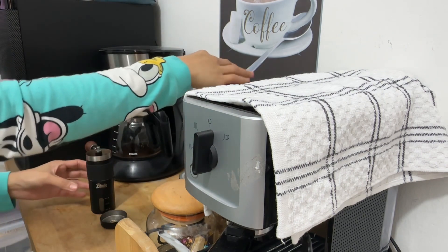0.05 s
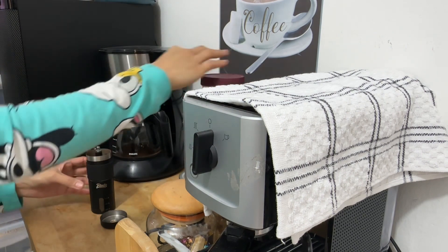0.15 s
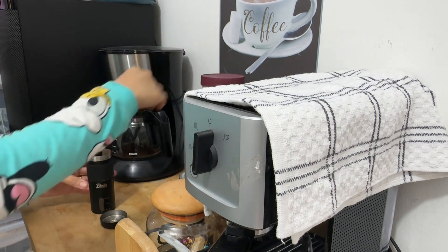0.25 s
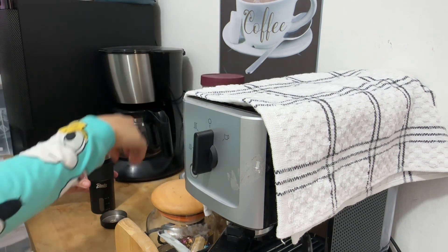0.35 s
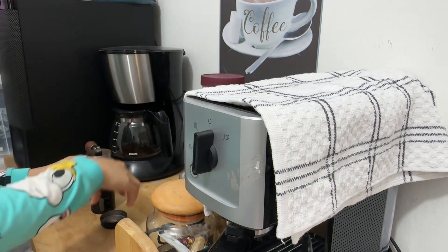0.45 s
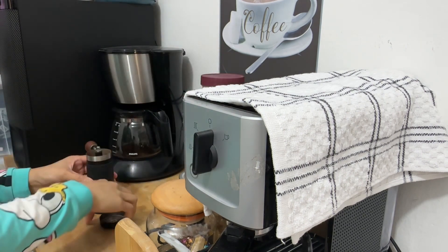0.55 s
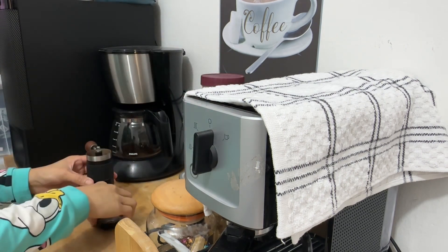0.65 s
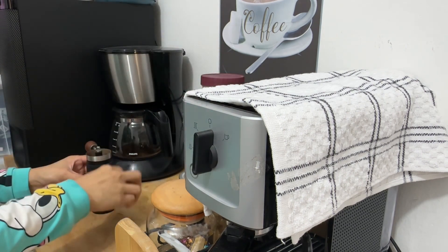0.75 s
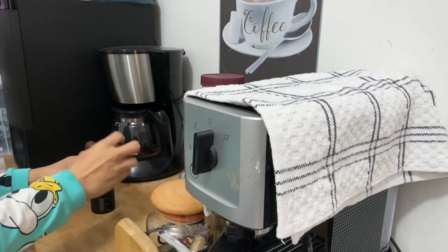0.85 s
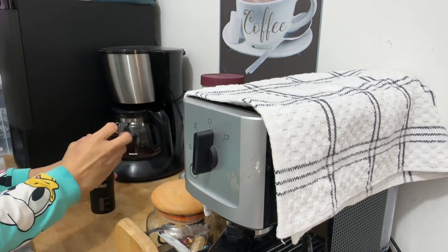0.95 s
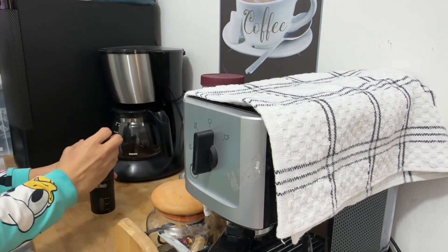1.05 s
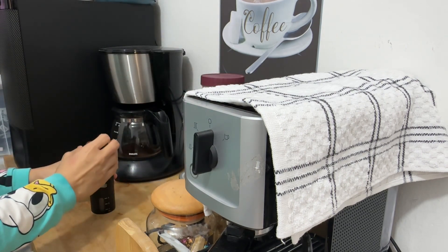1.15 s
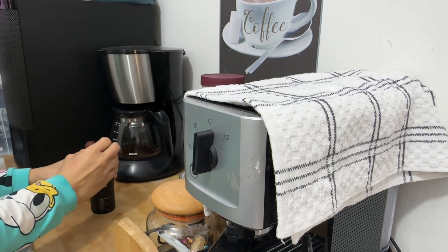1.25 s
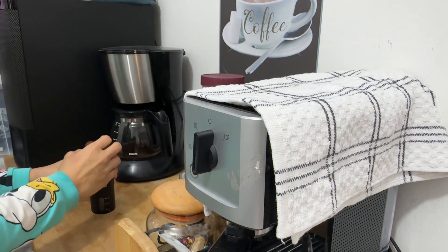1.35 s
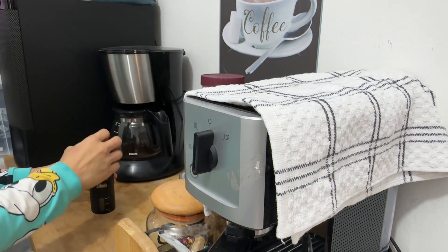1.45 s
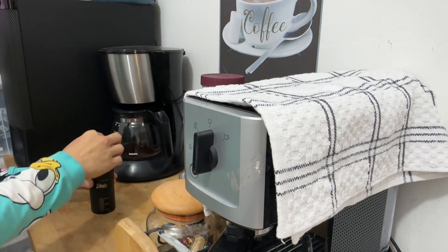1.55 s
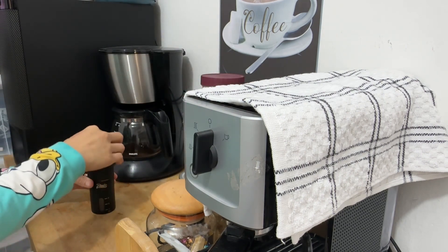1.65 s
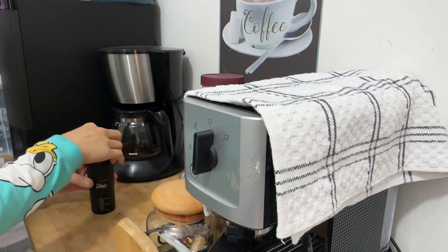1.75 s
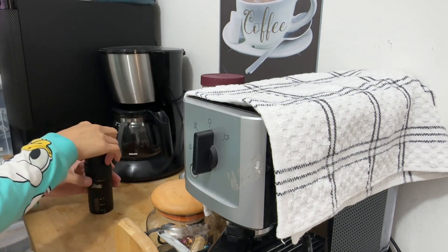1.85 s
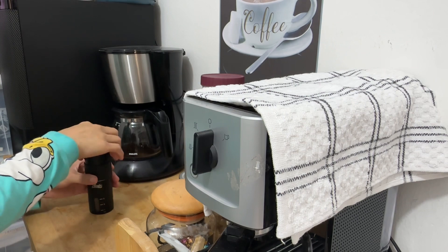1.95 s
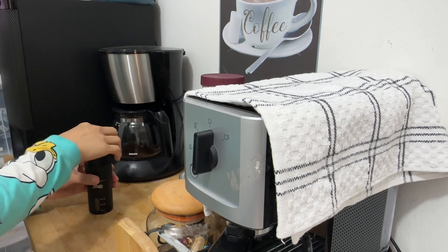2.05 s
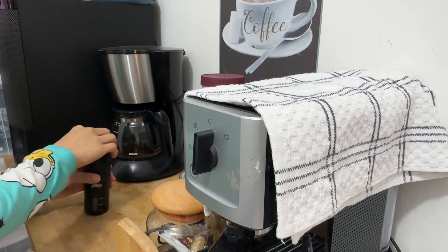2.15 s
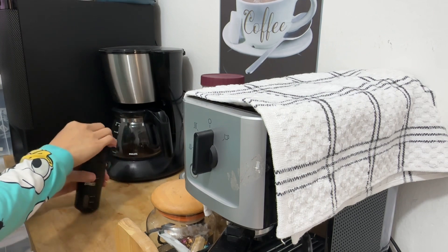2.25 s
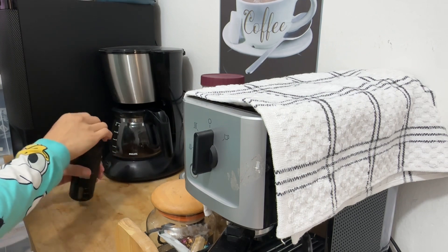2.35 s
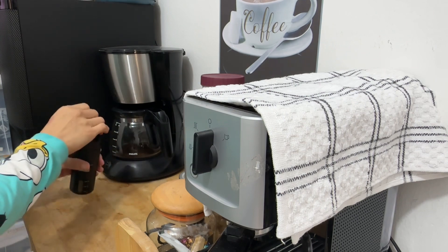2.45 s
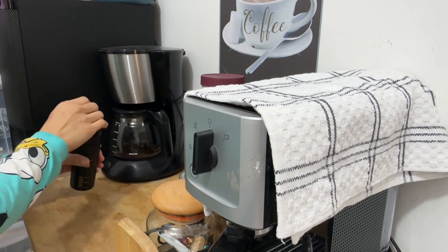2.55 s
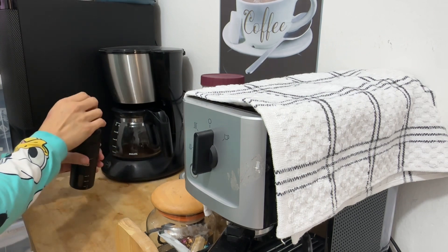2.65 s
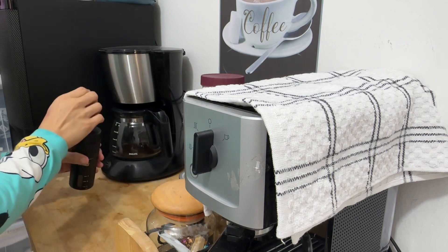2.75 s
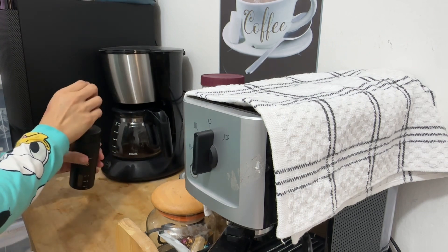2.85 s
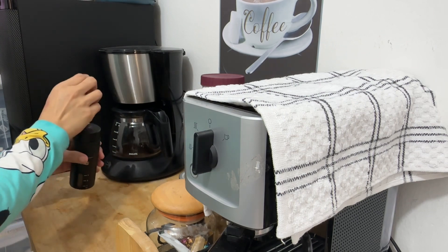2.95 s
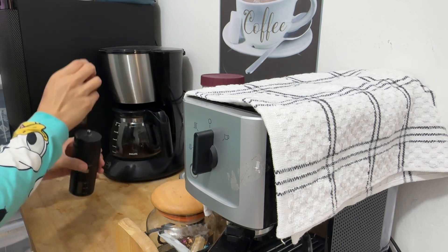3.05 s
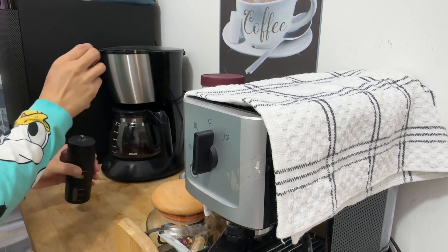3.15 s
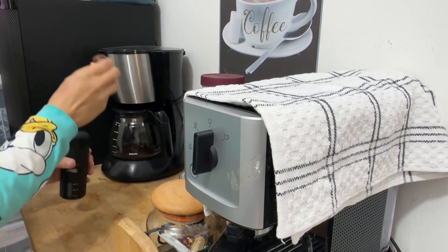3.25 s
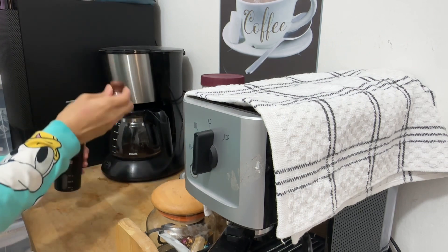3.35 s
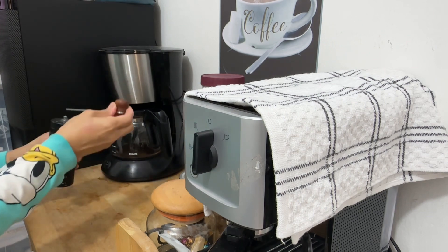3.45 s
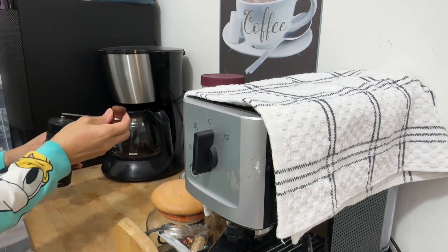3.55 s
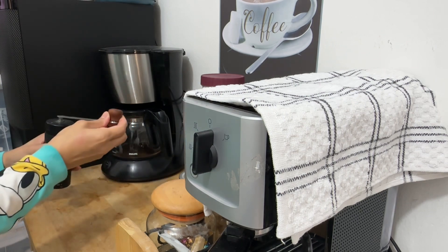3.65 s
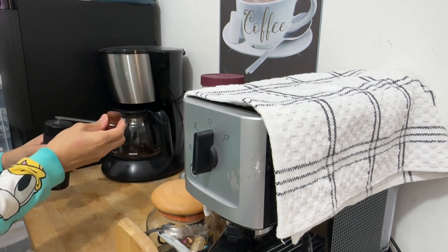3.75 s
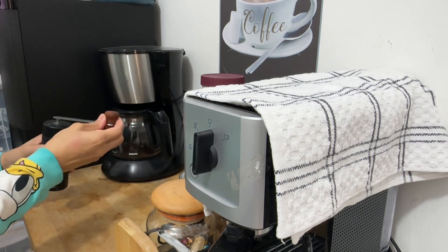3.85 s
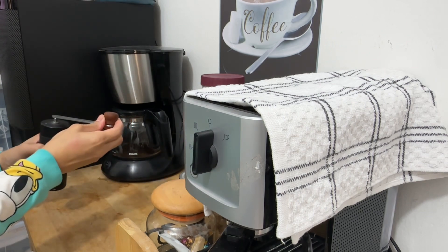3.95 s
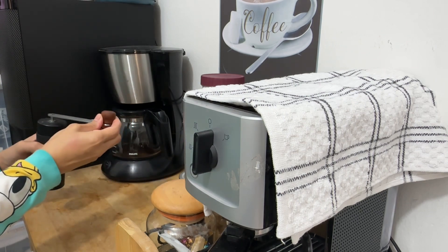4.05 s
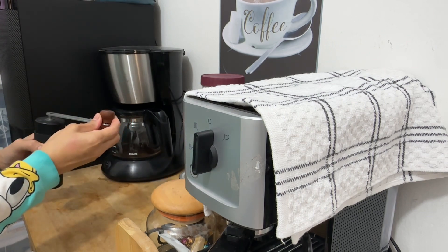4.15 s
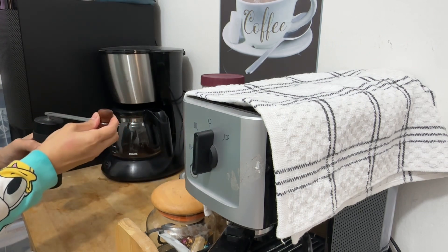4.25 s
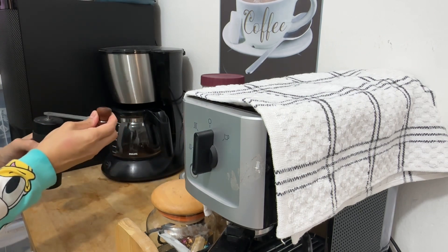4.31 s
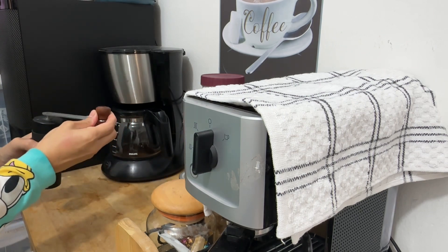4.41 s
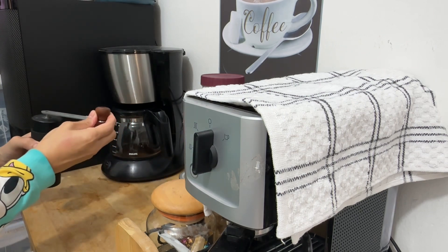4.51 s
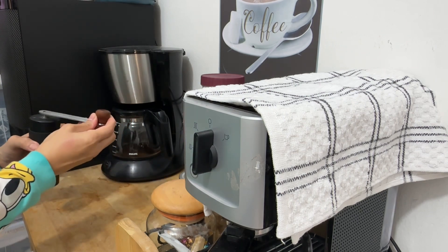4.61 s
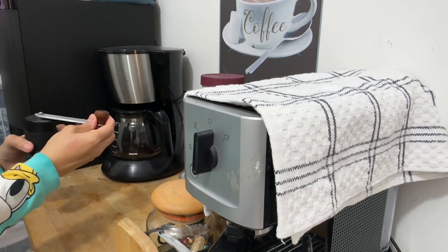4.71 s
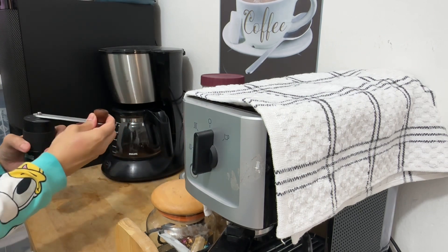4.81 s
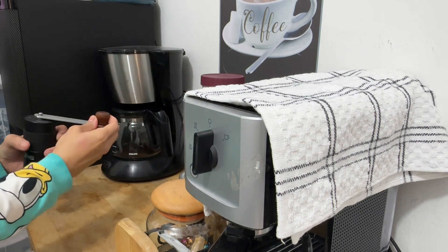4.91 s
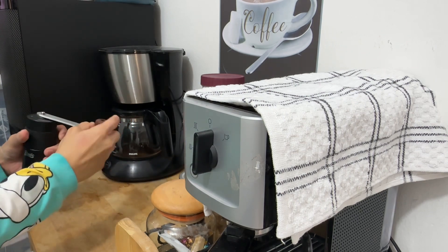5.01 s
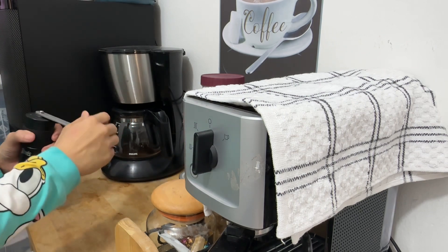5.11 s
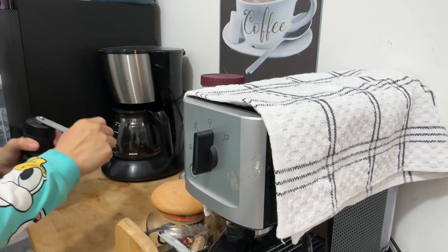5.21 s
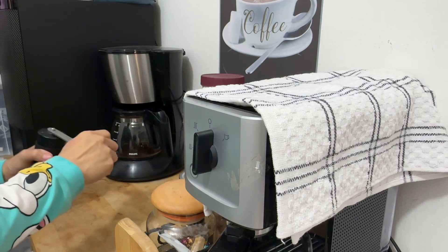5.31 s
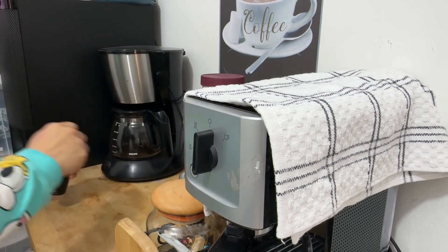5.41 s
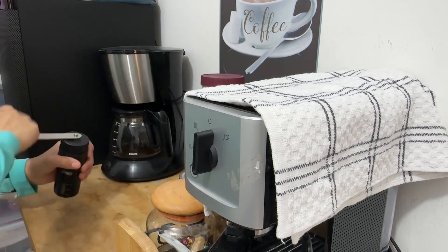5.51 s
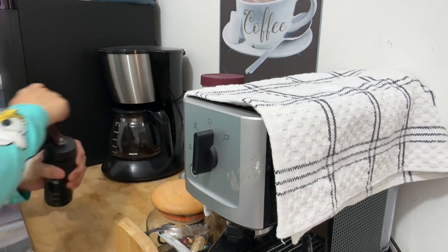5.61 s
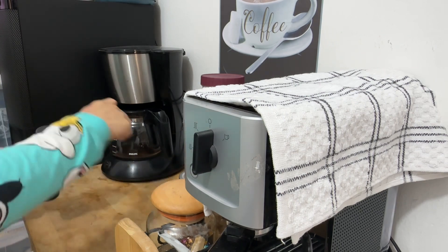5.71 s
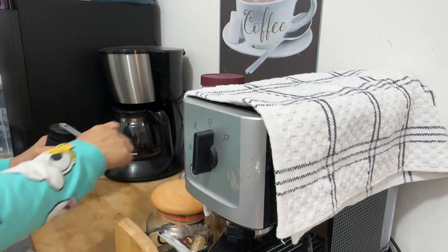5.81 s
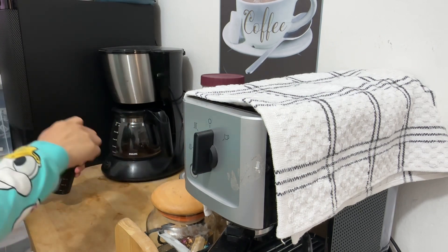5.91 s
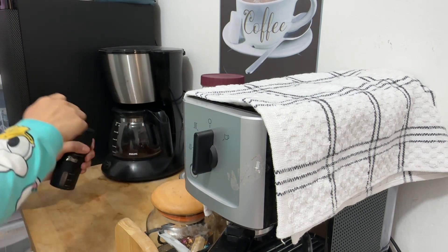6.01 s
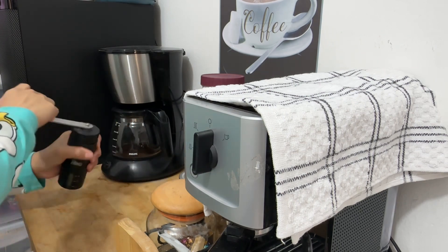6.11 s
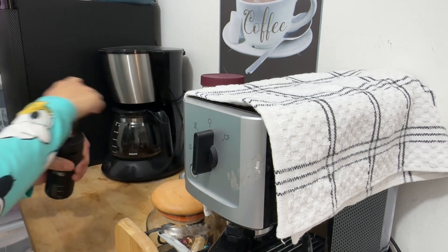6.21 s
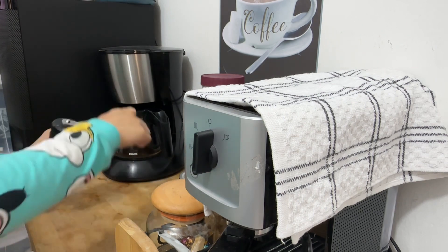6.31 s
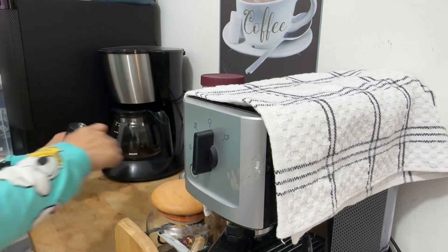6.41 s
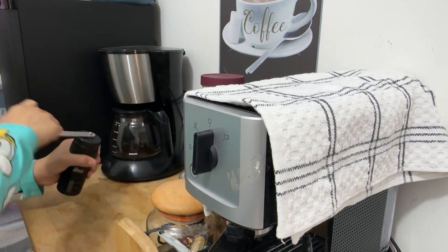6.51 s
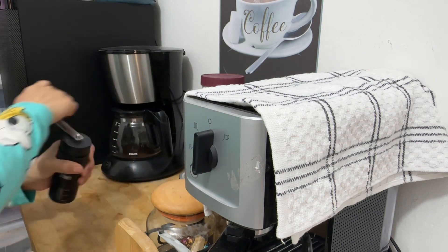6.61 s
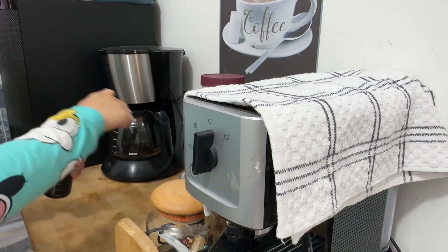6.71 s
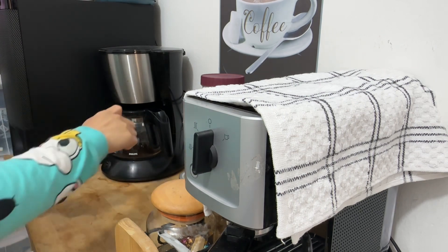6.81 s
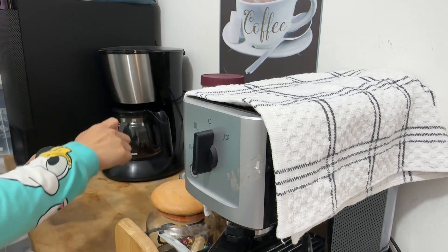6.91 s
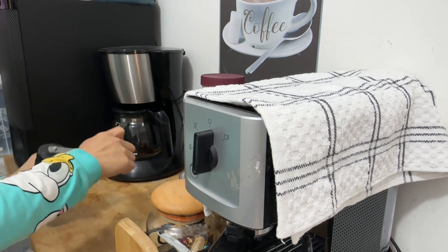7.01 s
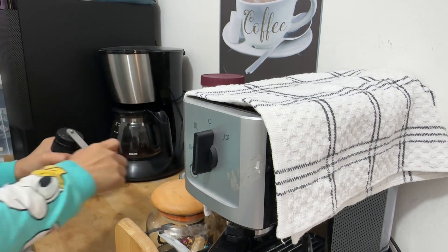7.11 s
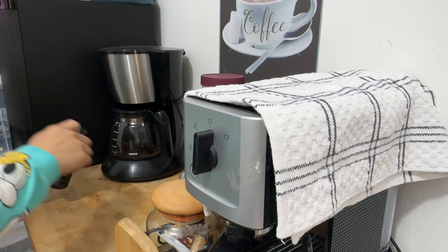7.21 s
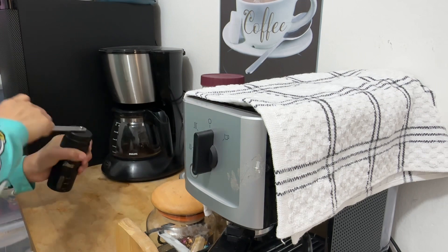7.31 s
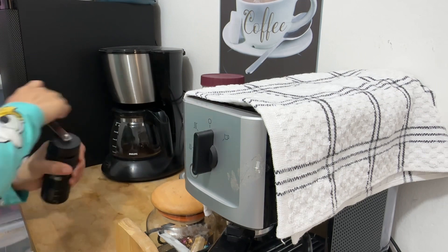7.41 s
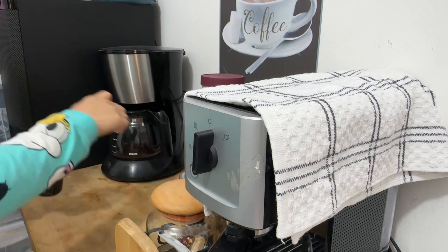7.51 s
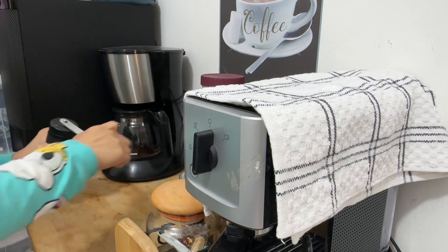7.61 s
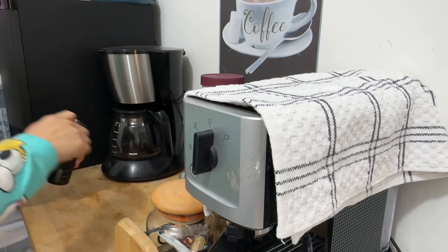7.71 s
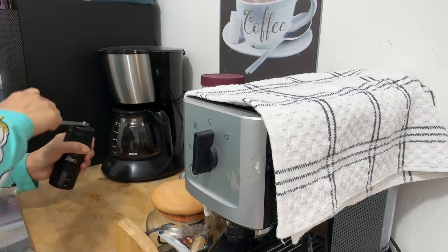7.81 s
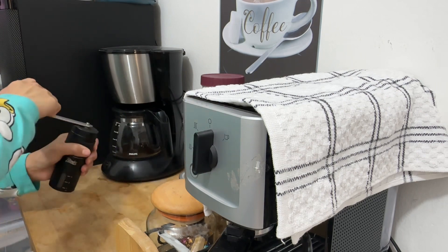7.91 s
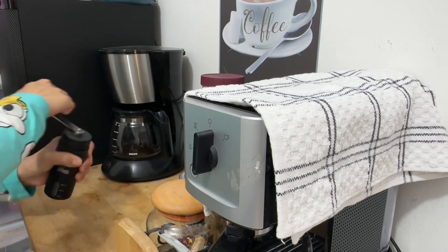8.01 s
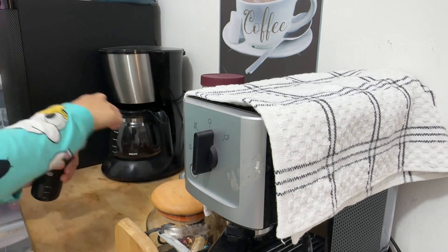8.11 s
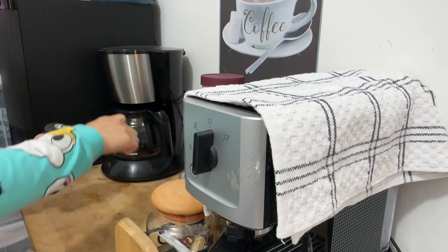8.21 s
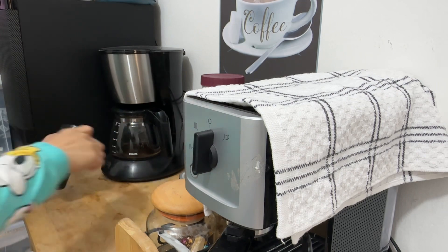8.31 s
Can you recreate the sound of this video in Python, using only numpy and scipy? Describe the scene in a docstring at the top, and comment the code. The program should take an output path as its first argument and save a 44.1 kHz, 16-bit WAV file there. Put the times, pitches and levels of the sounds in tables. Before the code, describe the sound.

Sparse handling comes first: a dull knock, bright steel ticks, a heavier thump on wood, light scuffs and clicks as the crank is fitted. Then hand grinding takes over, irregular dry crunching and cracking beans with fine rasp, a short catch and renewed turning until the end. Low steady hum and a faint throbbing whine, which fades as grinding starts. Close microphone, short kitchen reflections.

```python
"""A soft rub and a knock open the scene: a hand coffee grinder is handled on the counter of a small kitchen.
Clinks of its steel crank (noise bursts with ringing parts), rubs and more knocks then mingle.
From about 5 s the crank turns, with a short stall: random tiny breaks make the crunch, and beans snap.
A mains hum runs underneath throughout; a faint throbbing appliance whine fades as the grinding starts."""
import sys
import numpy as np
from scipy import signal
from scipy.fft import rfft, irfft, next_fast_len
from scipy.io import wavfile
from scipy.ndimage import uniform_filter1d, map_coordinates

SR = 44100
rng = np.random.default_rng(int(sys.argv[2]) if len(sys.argv) > 2 else 0)


def transcribe(signal):
    """Save signal, clipped to [-1, 1], as a 16-bit WAV file at the path in sys.argv[1]."""
    frames = np.atleast_2d(signal).T
    limited = np.clip(frames, -1, 1)
    pcm = np.round(limited * 32767).astype(np.int16)
    wavfile.write(sys.argv[1], SR, pcm)


N = 368676  # length of the scene in samples

# Beans caught between the burrs. Levels are relative.
# Columns: start_s, crack_db, crunch_db, crumble_s (time until the pieces die away), pitch_hz
BEANS = [(5.249, -31.5, -52, 0.0062, 1500), (5.266, -31, -39.5, 0.0057, 990),
         (5.309, -30.5, -53, 0.014, 1450), (5.338, -24, -34.5, 0.022, 1030),
         (5.373, -30.5, -38, 0.033, 583), (5.418, -24.5, -42.5, 0.0077, 600),
         (5.457, -20.5, -37.5, 0.0093, 635), (5.491, -23, -39, 0.006, 590), (5.56, -28.5, -40, 0.02, 1040),
         (5.648, -25.5, -43, 0.0036, 915), (5.655, -24, -36.5, 0.016, 1380),
         (5.687, -22.5, -34, 0.021, 860), (5.766, -23.5, -37, 0.0037, 537), (5.828, -31, -41, 0.012, 580),
         (5.872, -22, -65, 0.0022, 1400), (5.884, -17.5, -36, 0.0019, 1410),
         (6.018, -24.5, -51, 0.0089, 1420), (6.075, -24.5, -46, 0.0091, 1390),
         (6.131, -24.5, -39.5, 0.03, 580), (6.19, -24, -39.5, 0.036, 540), (6.222, -28.5, -38, 0.007, 503),
         (6.316, -32, -39, 0.0056, 570), (6.401, -29.5, -44, 0.016, 870), (6.444, -30, -43.5, 0.045, 520),
         (6.496, -31, -44, 0.055, 510), (6.689, -24, -48, 0.011, 1450), (6.766, -33.5, -72, .003, 2500),
         (6.916, -35.5, -68, 0.0071, 2480), (6.928, -24, -34.5, 0.0051, 1410),
         (6.957, -19, -37, .016, 1480), (6.987, -31, -35.5, 0.015, 620), (7.096, -21.5, -59, 0.004, 1400),
         (7.111, -29.5, -48, .004, 1390), (7.133, -27, -35, 0.032, 900), (7.205, -20, -36, 0.0073, 1150),
         (7.233, -26.5, -43, 0.015, 870), (7.306, -32, -45, 0.022, 580), (7.435, -25, -37, 0.012, 965),
         (7.496, -37, -39, 0.009, 920), (7.651, -29, -37, 0.019, 910), (7.687, -28, -49.5, 0.023, 610),
         (7.787, -26.5, -46, 0.017, 990), (7.834, -27.5, -59, 0.032, 1840), (7.872, -22, -58, 0.004, 1840),
         (7.918, -22, -39, 0.0042, 1810), (7.952, -18.5, -44.5, 0.0038, 1400),
         (7.961, -23.5, -44, 0.014, 1410), (8.053, -26, -44.5, 0.013, 980), (8.137, -26, -51, .005, 1410),
         (8.147, -21.5, -43, 0.0068, 1430), (8.237, -24.5, -36.5, 0.0053, 666),
         (8.273, -23.5, -32.5, 0.012, 850), (8.3, -41, -40, 0.026, 546), (8.346, -26, -39.5, 0.003, 1020),
         (8.356, -25.5, -52, .005, 1030)]
# Force on the crank in three runs, parted by a stall and a brief catch. Columns of each run: time_s, effort_db
EFFORT_RUNS = [
    [(5.26, -59), (5.31, -48.5), (5.4, -44), (5.53, -48), (5.6, -49), (5.7, -46), (5.8, -51.5),
     (5.98, -51.5), (6.06, -48), (6.2, -45), (6.28, -54), (6.36, -49), (6.48, -46.5), (6.64, -46),
     (6.72, -51.5), (6.79, -62.5)],
    [(6.925, -54), (6.97, -47), (7.015, -46), (7.05, -43.5), (7.13, -55.5), (7.23, -46.5), (7.35, -47),
     (7.45, -45.5), (7.61, -49.5), (7.7, -48.5), (7.78, -53)],
    [(7.787, -47.5), (7.83, -47.5), (8.21, -45.5), (8.33, -51.5), (8.36, -43)],
]
# Broad colour of the coarse crunch. Columns: frequency_hz, level_db
CRUNCH_COLOUR = [(60, -21), (160, -3), (270, -7.5), (330, -17), (480, -2), (1000, 7.5), (1600, -13),
                 (2500, 6), (5000, -26)]
# Resonances of the grinder's barrel. Columns: frequency_hz, width_hz, level_db
BARREL_MODES = [(190, 120, -15), (540, 103, 3), (935, 140, 3), (1489, 78, 6.5)]
# Broad colour of the fine grit. Columns: frequency_hz, level_db
GRIT_COLOUR = [(300, -53), (1200, 6.5), (2200, 3), (3300, -1), (4600, 6), (6300, -10.5), (8000, -12),
               (10000, -6.5), (12500, -0.5), (15500, -45)]
# Resonances of the burrs. Columns: frequency_hz, width_hz, level_db
BURR_MODES = [(2796, 54, 6.5), (4100, 1800, -1.5), (5640, 29, 2.5), (8110, 28, 1.5)]
# Hiss of the finest dust. Columns: frequency_hz, level_db
DUST_COLOUR = [(2000, -9.5), (6000, -1.5), (9500, 0.5), (12000, -11), (15000, 4.5), (16000, -26)]
EASY_EFFORT_DB = -47  # an ordinary turn of the crank
GRIT_DB, CRUNCH_DB = 4, -3  # fine and coarse pieces, over the effort
CRUNCH_GROWS, DUST_GROWS = 2, 1.35  # dB of crunch per dB of effort; dB of dust hiss per dB of grit
BROAD_DB = -9  # broad part of a bean's crunch, relative to its crunch_db
SHARDS_DB, SHARD_DUST_DB = -18.5, -9  # grit of a bean, over its crack or its crunch: the louder counts


def grinding():
    """Effort sets a steady crunch in the barrel and a rasp on the burrs; broken beans swell both."""
    coarse = fractures(rate=600, spread_db=0.0, clump_db=3.0, clump_rate=79)
    fine = fractures(rate=1600, spread_db=4.5, clump_db=2.3, clump_rate=110)
    lumps = chips(rate=130, hz=652, octaves=0.532, cycles=2.2, spread_db=1.0)
    dust = coloured(fractures(rate=9000, spread_db=2.5, clump_db=2.0, clump_rate=130), DUST_COLOUR)

    # outside its own times a run is practically silent
    effort_db = np.max([curves(run, outside=-120)[0] for run in EFFORT_RUNS], axis=0)
    steady_crunch_db = EASY_EFFORT_DB + CRUNCH_DB + CRUNCH_GROWS * (effort_db - EASY_EFFORT_DB)
    _, crack_db, crunch_db, _, _ = np.transpose(BEANS)
    bean_grit_db = np.maximum(crack_db + SHARDS_DB, crunch_db + SHARD_DUST_DB)
    # hypot adds the energies of the steady grinding and the broken beans
    crunch_gain = np.hypot(amp(steady_crunch_db), crumbling(crunch_db + BROAD_DB))
    grit_gain = np.hypot(amp(effort_db + GRIT_DB), crumbling(bean_grit_db))

    pieces = amp(-4.5) * coarse + amp(-12.0) * lumps
    barrel = coloured(crunch_gain * pieces, CRUNCH_COLOUR, BARREL_MODES)
    burrs = coloured(amp(-0.2) * grit_gain * fine, GRIT_COLOUR, BURR_MODES)
    easy_gain = amp(EASY_EFFORT_DB + GRIT_DB)
    dust_gain = easy_gain * (grit_gain / easy_gain) ** DUST_GROWS
    return shifting(barrel + burrs) + amp(-7.5) * dust_gain * dust


SHIFT_DB = 2.8  # how far the colour of the crunch strays


def shifting(x):
    """The load between the burrs keeps changing, so narrow bands of the crunch swell and sink."""
    bands = signal.stft(x, nperseg=512)[2]
    field = uniform_filter1d(rng.standard_normal(bands.shape), size=5, axis=0)  # smooth over pitch
    field = uniform_filter1d(field, size=12, axis=1)  # smooth over time
    gain = unit(amp(SHIFT_DB * unit(field)))
    return signal.istft(bands * gain, nperseg=512)[1][:N]


CRUMBLE_RELEASE_S = 0.0056  # time constant with which the pieces die away


def crumble(length):
    """Gain of one bean's pieces: it starts full, holds while they crumble, then dies away."""
    t = np.arange(SR // 4) / SR
    return np.exp(-np.maximum(t - length, 0) / CRUMBLE_RELEASE_S)


def crumbling(levels_db):
    """Gain of the pieces of all beans together, adding up their energies."""
    power = np.zeros(N)
    for (s, _, _, length, _), db in zip(BEANS, levels_db):
        add(power, s, (amp(db) * crumble(length)) ** 2)
    return np.sqrt(power)


RING_DB, RING_Q = -7.5, 7  # level of the pitched ring over a bean's crunch; its sharpness


def crunches():
    """Each bean breaks up in a short volley of cracks that rings the barrel at a pitch of its own."""
    breaks = fractures(rate=900, spread_db=3, clump_db=1, clump_rate=90)
    breaks = np.pad(breaks, (0, SR))  # room for the last volley
    track = np.zeros(N)
    for s, _, db, length, hz in BEANS:
        gain = crumble(length)
        volley = gain * breaks[round(s * SR):][:len(gain)]
        add(track, s, amp(db + RING_DB) * np.linalg.norm(gain) * resonant(volley, hz, RING_Q))
    return track


THUD_DB = 24  # thud in the barrel, over a bean's crunch
SNAP_LAG_S = 0.001  # crack and thud start this long after the bean's listed time


def snaps():
    """Each caught bean cracks on the burrs and thuds in the barrel, 1 ms after its listed time."""
    s, crack_db, crunch_db, _, _ = np.transpose(BEANS)
    thuds = blows(s + SNAP_LAG_S, crunch_db + THUD_DB, t60=0.016)
    cracks = blows(s + SNAP_LAG_S, crack_db + 13, t60=0.012)
    return coloured(thuds, CRUNCH_COLOUR, BARREL_MODES) + coloured(cracks, GRIT_COLOUR, BURR_MODES)


# Steel slips and sings briefly. Columns: middle_s, pitch_hz, level_db, half_length_s
SQUEALS = [(0.544, 9200, -53, 0.029), (0.548, 13700, -59, 0.031), (6.635, 8070, -41, 0.02),
           (7.052, 5700, -33.5, 0.013), (8.225, 5650, -46.5, 0.04)]


def squeals():
    """Steel slips and sings at one of its modes, made rough by a randomly drifting phase."""
    track, t = np.zeros(N), np.arange(N) / SR
    drift = 1.3 * wobble(300)  # radians
    for s, hz, db, half_length in SQUEALS:
        near = np.abs(t - s) < half_length
        swell = np.cos(np.pi / 2 * (t[near] - s) / half_length) ** 2
        track[near] += amp(db) * swell * np.sin(2 * np.pi * hz * t[near] + drift[near])
    return track


# Crank and lid touch the grinder. Levels after level_db are relative to it.
# Columns: start_s, level_db, body_db, bright_db, edge_db, part_pitch_hz, part_ring_db, crank_ring_db
CLINKS = [(0.538, -58.5, 5.5, -18, -6, 2740, 20.5, -3), (1.122, -37, 1.5, -34, -44, 2610, 3, 16),
          (1.157, -25.5, -9.5, -7.5, -27, 3750, -15, -1), (1.476, -44, -5.5, -2.5, -14, 5060, 1, 0),
          (1.503, -42.5, -1.5, -6.5, -13, 3730, -2, -7), (1.569, -42, -30, -32, -31, 4900, -5, -4),
          (2.811, -65, -14, 2, 8.5, 5000, 2, -9), (3.605, -39, -35, -2.5, -6, 1980, 2, 6.5),
          (4.005, -40, -36, -35, -43, 3580, 0, -8), (4.313, -36.5, -32, -20, -29, 2270, -7, 6.5),
          (4.346, -28.5, -38, -16.5, -29, 2120, -26, -27), (4.637, -23.5, -51, -14, -12, 2000, -20, -3),
          (5.013, -46, -28, -14.5, -19, 2950, -19, -7), (5.057, -48.5, -24, -36, -38, 2340, -20, -14),
          (5.166, -41.5, -27, -18.5, -25, 2490, -8, -14)]
# Modes of the loose crank. Columns: frequency_hz, level_db, t60_s (time to fall by 60 dB)
LOOSE_CRANK = [(1622, 2, 0.2), (2530, 10, 0.23), (3800, 3, 0.14), (5470, 11.5, 0.29), (7300, -1, .17),
               (9150, 10, 0.33), (10400, 9, .2)]
# Modes of the crank on its shaft. Columns: frequency_hz, level_db, t60_s
SEATED_CRANK = [(1870, 1, 0.13), (2850, 1, .18), (5600, 4, 0.26), (5760, 5, .26), (8900, 4, 0.3)]
SEATED_S = 3  # from here on the crank sits on its shaft
# Colour of the tick where the parts touch. Columns: frequency_hz, level_db
TICK_COLOUR = [(300, -10), (1000, -2), (1900, 6), (3500, 0.5), (6000, -5.5), (12000, -47.5)]
# Colour of the hollow body. Columns: frequency_hz, level_db
BODY_COLOUR = [(100, -12), (300, -10), (500, 4), (750, 1.5), (1200, -8.5), (2500, -49)]
# Colour of the bright part of a contact. Columns: frequency_hz, level_db
BRIGHT_COLOUR = [(1500, -18.5), (4000, -1), (6000, -4), (9000, 1.5), (10500, -1), (12000, -14.5)]
# Colour of the thin treble edge. Columns: frequency_hz, level_db
EDGE_COLOUR = [(6000, -44), (11000, -15), (13500, -9), (16000, -21.5)]


def clinks():
    """Each contact ticks, rings the struck part and the crank, and knocks the hollow body."""
    s, db, body_db, bright_db, edge_db = np.transpose(CLINKS)[:5]
    ring, t = np.zeros(N), np.arange(SR // 2) / SR
    for start, level, _, brightness, _, pitch, part_db, crank_db in CLINKS:
        crank = LOOSE_CRANK if start < SEATED_S else SEATED_CRANK
        modes = np.zeros(len(t))
        for hz, mode_db, t60 in crank:
            strength_db = mode_db + rng.normal(0, 1.5) + brightness * (hz > 5000)
            # play in the joint blurs the phase
            blur = np.cumsum(rng.normal(0, 0.05, len(t)))
            modes += amp(strength_db - 60 * t / t60) * np.sin(2 * np.pi * hz * t + blur)
        part = resonant(burst(t60=0.035), pitch, q=18)
        add(ring, start, amp(level + crank_db - 33.0) * modes)
        add(ring, start, amp(level + part_db + 10.5) * part)
    tick = coloured(blows(s, db + 9, t60=0.02), TICK_COLOUR)
    body = coloured(blows(s, db + body_db + 20.0, t60=0.048), BODY_COLOUR)
    # each contact has its own listed bright and edge levels
    bright = coloured(blows(s, db + bright_db + 19.5, t60=0.017), BRIGHT_COLOUR)
    edge = coloured(blows(s, db + edge_db + 20, t60=0.022), EDGE_COLOUR)
    return ring + tick + body + bright + edge


# The grinder's base meets the wooden counter. Columns: start_s, level_db, bass_db
KNOCKS = [(0.006, -33.5, -2.5), (1.502, -45, 9), (1.527, -47.5, -3), (1.569, -39, -9), (1.586, -37, -18),
          (1.744, -45, -9), (1.954, -29.5, 6), (2.247, -52.5, -15)]
# Modes of the counter board. Columns: frequency_hz, level_db, t60_s
COUNTER_MODES = [(177, -8.5, 0.13), (207, 7.5, 0.041), (248, -4, 0.046), (484, -10, 0.076),
                 (762, 5.5, 0.04)]
# Colour of the dull wooden blow. Columns: frequency_hz, level_db
WOOD_COLOUR = [(150, -2), (600, 6.5), (1600, -14.5), (6000, -55)]


def knocks():
    """A soft-edged blow rings the board; each knock has its own listed strength of the lowest modes."""
    s, db, bass_db = np.transpose(KNOCKS)
    board, t = np.zeros(N), np.arange(SR // 4) / SR
    soft_start = 1 - np.exp(-t / 0.0062)
    for start, level, bass in zip(s, db, bass_db):
        modes = np.zeros(len(t))
        for hz, mode_db, t60 in COUNTER_MODES:
            fade = amp(mode_db + bass * (hz < 400) - 60 * t / t60)
            modes += fade * np.sin(2 * np.pi * (hz * t + rng.random()))
        add(board, start, amp(level - 9.0) * modes * soft_start)
    return board + coloured(blows(s, db + 15.5, t60=0.018), WOOD_COLOUR)


# Fingers, sleeve and crank slide over the parts.
# Columns: start_s, length_s, level_db, resonance_hz, sharpness_q (no unit; below 1 counts as 1)
SCUFFS = [(0, 0.049, -53, 380, 4.9), (0.402, 0.086, -62, 950, 0.86), (0.491, 0.079, -52.5, 3880, 4.3),
          (1.155, 0.045, -50.5, 1800, 1.9), (1.702, 0.15, -66.5, 637, 4.3), (2.018, 0.07, -67, 4130, 22),
          (2.138, 0.017, -60.5, 4600, 3.5), (2.219, 0.067, -57.5, 3460, 9.2),
          (2.327, 0.072, -57.5, 3480, 14), (2.443, 0.079, -60, 3470, 2.6), (3.229, 0.07, -65, 1190, 1.8),
          (3.394, 0.1, -61.5, 920, 8.7), (3.512, 0.064, -61.5, 1100, 2.3), (3.71, 0.31, -74, 5700, 52),
          (3.767, 0.2, -59.5, 1480, 2.8), (3.979, 0.15, -66, 3000, 1.5), (4.62, 0.032, -59.5, 2500, 1.5)]
# Colour of the broad rustle. Columns: frequency_hz, level_db
SKIN_COLOUR = [(100, -37), (400, 10), (1200, 5), (2000, 0), (3600, -1.5), (7000, -18), (10000, -28),
               (15000, -11)]


def rubbing():
    """Each stroke swells and fades: many tiny slips excite a resonance of the part being rubbed."""
    slips = fractures(rate=1400, spread_db=4, clump_db=4.5, clump_rate=70)
    rustle, track = coloured(slips, SKIN_COLOUR), np.zeros(N)
    for s, length, db, hz, q in SCUFFS:
        stroke = slice(round(s * SR), round((s + length) * SR))
        resonance = unit(resonant(slips[stroke], hz, q))
        scrape = amp(-9.0) * unit(rustle[stroke]) + amp(-7.0) * resonance
        swell = signal.windows.tukey(len(scrape), 0.8)
        add(track, s, amp(db) * swell * scrape)
    return track


# The two ports hear the grinder from the left, round the housing. Columns: frequency_hz, left_lead_rad
PORT_PHASE = [(100, -4), (1000, 1.03), (2000, 3.5), (5600, 7.5), (12800, 7)]
# Share of the near sound that glances off counter and appliances. Columns: frequency_hz, share (0-1)
SCATTERED = [(400, .02), (1400, .42), (2800, .25), (6000, .36), (12000, .08)]
SCATTER_T60_S = 0.014  # these first reflections fall by 60 dB in this time


def nearby(x):
    """Part of the sound goes straight to the ports; the rest glances off things close by.

    The glancing paths differ for each port and are redrawn every quarter second as hands move."""
    sides, step, t = np.array([[0.5], [-0.5]]), SR // 4, np.arange(SR // 50) / SR

    def share(hz):
        """Share of the energy that glances off."""
        return np.clip(along(SCATTERED, hz), 0, 1)

    glancing = np.zeros((2, N))
    for start in range(0, N, step):
        paths = rng.standard_normal((2, len(t))) * amp(-60 * t / SCATTER_T60_S)
        paths /= np.linalg.norm(paths, axis=1, keepdims=True)
        add(glancing, start / SR, signal.fftconvolve(x[None, start:start + step], paths, axes=1))
    straight = filtered(x, lambda hz: np.sqrt(1 - share(hz)) * np.exp(1j * sides * along(PORT_PHASE, hz)))
    return straight + filtered(glancing, lambda hz: np.sqrt(share(hz)))


# How long the room rings. Columns: frequency_hz, t60_s
ROOM_T60 = [(150, 0.31), (800, 0.44), (2100, 0.34), (5500, 0.42), (14000, 0.21)]
# Room sound over the sound sent into it. Columns: frequency_hz, level_db
ROOM_LEVEL = [(150, 3.5), (700, -2.5), (2500, 1), (4500, -2), (6300, -0.5), (9000, -4), (14000, -8.5)]


def kitchen(x):
    """Hard walls answer; the pattern of echoes changes as hands and grinder move."""
    wet, step = np.zeros((2, N)), SR // 4
    for start in range(0, N, step):
        hz, t, noise = signal.stft(rng.standard_normal((2, SR // 2)), SR, nperseg=256)
        t60 = along(ROOM_T60, hz)[:, None]
        fade = amp(along(ROOM_LEVEL, hz)[:, None] - 60 * t / t60)
        fade = fade * np.sqrt(2 * np.log(1000) / (t60 * SR))  # same energy however long it rings
        tail = signal.istft(noise * fade * (t > 0), SR, nperseg=256)[1]
        add(wet, start / SR, signal.fftconvolve(x[None, start:start + step], tail, axes=1))
    return wet


# Colour of the low rumble. Columns: frequency_hz, level_db
RUMBLE_COLOUR = [(20, -30.5), (31, -20.5), (47, 3.5), (63, 3.5), (128, 3.5), (160, -15.5), (200, -14),
                 (260, -26), (650, -28.5), (2000, -36.5), (15000, -55)]


def hum():
    """Mains hum at 100 Hz over a low rumble of filtered noise, alike at both ports in the bass."""
    mid, side = filtered(rng.standard_normal((2, N)), lambda hz: amp(along(RUMBLE_COLOUR, hz)))
    side = filtered(side, lambda hz: amp(along([(110, -19), (300, -6), (900, -1)], hz)))
    rumble = amp(-56.0) * unit(np.array([mid + side, mid - side]))
    tone = unit(np.sin(2 * np.pi * 100 * np.arange(N) / SR))
    return rumble + amp(-52.0 + 0.31 * wobble(1.6)) * tone


# Level of the appliance whine. Columns: time_s, level_db
WHINE_LEVEL = [(0, -77.5), (1.2, -74), (1.7, -84.5), (2.2, -77), (3.6, -82), (4.7, -77.5), (5.4, -95)]
THROB_RATE = 5.2  # throbs a second


def whine():
    """A thin, slightly unsteady appliance tone throbs and wavers differently at each port."""
    level_db, = curves(WHINE_LEVEL)
    throb = np.abs(np.sin(np.pi * THROB_RATE * np.arange(N) / SR)) ** 0.6
    phase = 2 * np.pi * np.cumsum(1316 + 2.52 * wobble(8.3)) / SR  # pitch in Hz, summed to a phase
    sway_db = 2.5 * np.array([wobble(3.3), wobble(4.1)])
    return amp(level_db + 11.5 + sway_db) * (0.084 + throb) * np.sin(phase)


def fractures(rate, spread_db, clump_db, clump_rate):
    """Random tiny breaks of rms 1: most are small, a few large, and they come in clumps."""
    at = np.flatnonzero(rng.random(N) < rate / SR)
    size_db = spread_db * np.minimum(rng.exponential(size=N)[at], 4)
    size_db = size_db + clump_db * wobble(clump_rate)[at]
    return unit(np.bincount(at, amp(size_db) * rng.choice([-1, 1], N)[at], N))


def chips(rate, hz, octaves, cycles, spread_db, size=700):
    """Fragments, of rms 1, that each ring for a few cycles at a pitch set by their size."""
    start = np.flatnonzero(rng.random(N) < rate / SR)[:, None]
    pitch = np.minimum(hz * 2 ** (octaves * rng.standard_normal(N)[start]), SR / 3)
    size_db = spread_db * np.minimum(rng.exponential(size=N)[start], 3)
    turns = pitch * np.arange(size) / SR
    rings = amp(size_db) * np.sqrt(pitch) * np.sin(2 * np.pi * turns) * np.exp(-turns / cycles)
    return unit(np.bincount((start + np.arange(size)).ravel(), rings.ravel(), N)[:N])


def burst(t60):
    """The force of one contact, noise of energy 1: it builds up fast and falls by 60 dB in t60."""
    t = np.arange(SR // 5) / SR
    rise = (1 - np.exp(-t / 0.0006)) ** 2
    force = rng.standard_normal(len(t)) * amp(-60 * t / t60) * rise
    return force / np.linalg.norm(force)


def blows(times, levels_db, t60):
    """A track of contacts."""
    track = np.zeros(N)
    for s, db in zip(times, levels_db):
        add(track, s, amp(db) * burst(t60))
    return track


def resonant(x, hz, q):
    """What one resonance picks out of x, at energy 1; silence stays silent."""
    y = signal.lfilter(*signal.iirpeak(min(hz, SR / 3), max(q, 1), SR), x)
    return y / (np.linalg.norm(y) + 1e-20)


def coloured(x, spectrum, modes=(), size=8192):
    """x through a causal filter of energy 1: a broad spectrum with resonances on top."""
    hz = np.fft.rfftfreq(size, 1 / SR)
    power = amp(along(spectrum, hz)) ** 2
    for centre, width, db in modes:
        peak = amp(db) * hz * width / (centre ** 2 - hz ** 2 + 1j * hz * width)
        power = power + np.abs(peak) ** 2
    # the folded cepstrum gives the filter that responds as early as it can
    cepstrum = irfft(np.log(power / power.mean()))[:size // 2]
    cepstrum[0] /= 2
    return signal.oaconvolve(x, irfft(np.exp(rfft(cepstrum, size))))[:N]


def filtered(x, response):
    """x times a complex response of frequency."""
    size = next_fast_len(N + SR // 2, real=True)
    return irfft(rfft(x, size) * response(np.fft.rfftfreq(size, 1 / SR)), size)[..., :N]


def amp(db):
    """Decibels to gain."""
    return 10 ** (np.asarray(db) / 20)


def unit(x):
    """Scale to rms 1."""
    return x / np.sqrt(np.mean(x ** 2) + 1e-20)


def along(points, hz):
    """(Hz, value) points read on a log axis."""
    f, v = np.transpose(points)
    return np.interp(np.log(hz + 1), np.log(f + 1), v)


def curves(rows, outside=None):
    """One value per sample for each column after the time."""
    s, *cols = np.transpose(rows)
    return [np.interp(np.arange(N) / SR, s, c, outside, outside) for c in cols]


def wobble(rate):
    """A smooth random curve, rate knots a second."""
    knots = rng.standard_normal(int(N * rate / SR) + 4)
    coarse = np.arange(0, N, SR // 1500)
    return np.interp(np.arange(N), coarse, map_coordinates(knots, [coarse * rate / SR]))


def add(track, s, sound):
    """Mix a sound into a track at time s."""
    part = track[..., max(round(s * SR), 0):][..., :sound.shape[-1]]
    part += sound[..., :part.shape[-1]]


# How much louder the left port is than the right. Columns: frequency_hz, left_over_right_db
PORT_TILT = [(200, -0.5), (450, 2), (1100, 4), (2200, -0.5), (4500, 3), (6700, 7), (8500, 0)]
MILL_ROOM_DB, SNAP_ROOM_DB, PARTS_ROOM_DB, KNOCK_ROOM_DB = -0.5, -3.5, 5, 0  # sent to the walls


def scene():
    """All the handling reaches two microphone ports, directly and by way of the walls."""
    mill = grinding() + crunches() + squeals()
    beans = snaps()
    parts = clinks() + rubbing()
    board = knocks()
    direct = nearby(mill + beans + parts + board)
    to_walls = amp(MILL_ROOM_DB) * mill + amp(SNAP_ROOM_DB) * beans
    to_walls = to_walls + amp(PARTS_ROOM_DB) * parts + amp(KNOCK_ROOM_DB) * board
    heard = direct + kitchen(to_walls)
    sides = np.array([[0.5], [-0.5]])  # left gains half the tilt, right loses half
    return filtered(heard, lambda hz: amp(sides * along(PORT_TILT, hz))) + hum() + whine()


# A narrow gap in the treble near 11 kHz. Columns: frequency_hz, level_db
TREBLE_GAP = [(9800, -0.5), (11000, -18.5), (11800, -19), (12800, -1)]
TOP_HZ = 16200  # band limit


def record(dry):
    """The sound has a narrow gap in the treble near 11 kHz and nothing above the band limit."""
    return filtered(dry, lambda hz: amp(along(TREBLE_GAP, hz)) * (hz < TOP_HZ))


dry = scene()
out = record(dry)
transcribe(out)
```